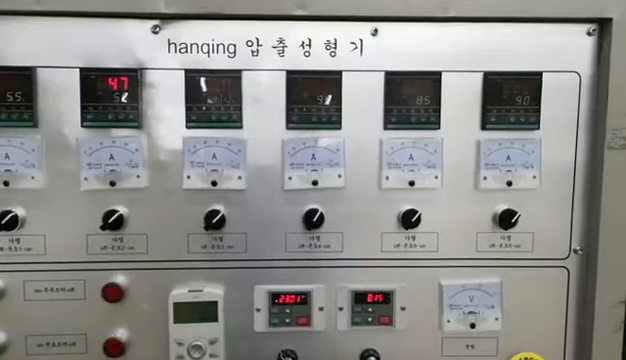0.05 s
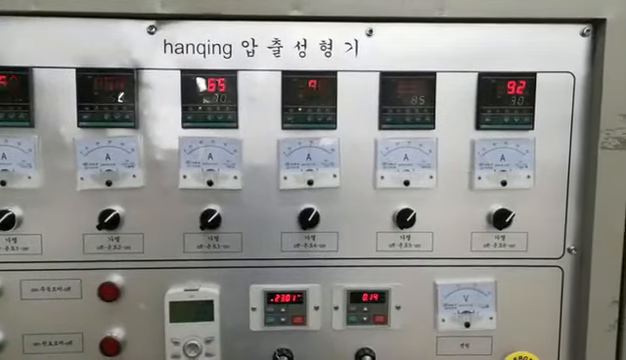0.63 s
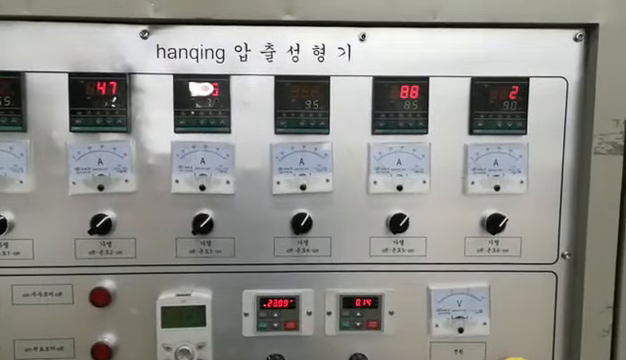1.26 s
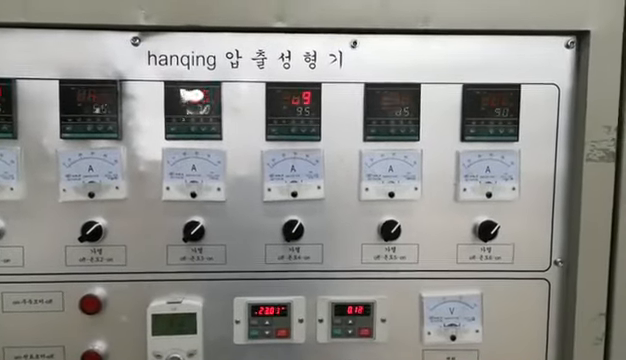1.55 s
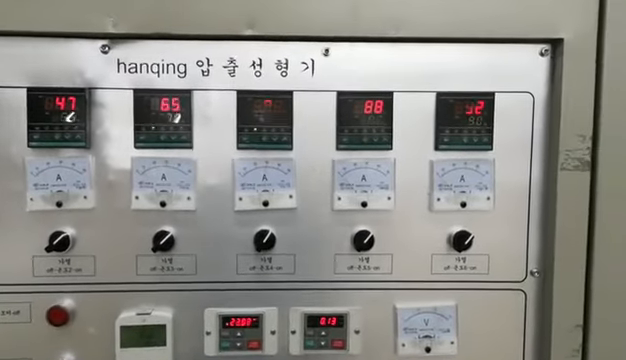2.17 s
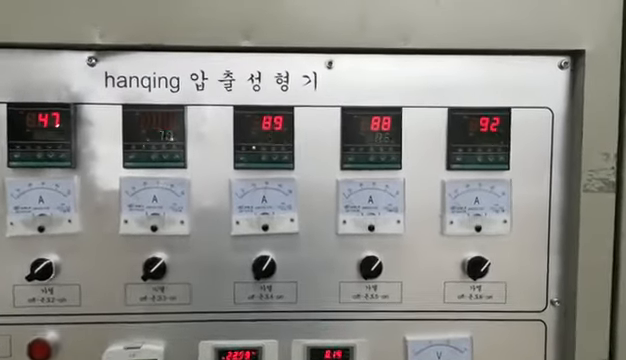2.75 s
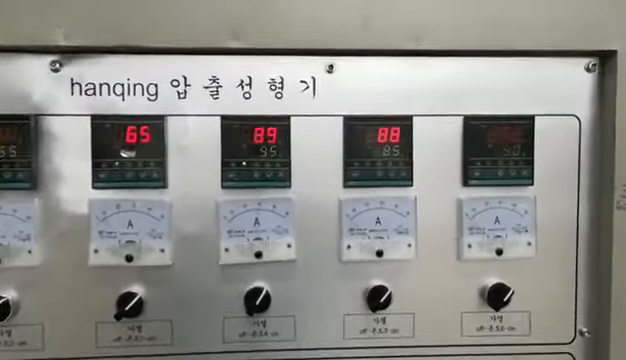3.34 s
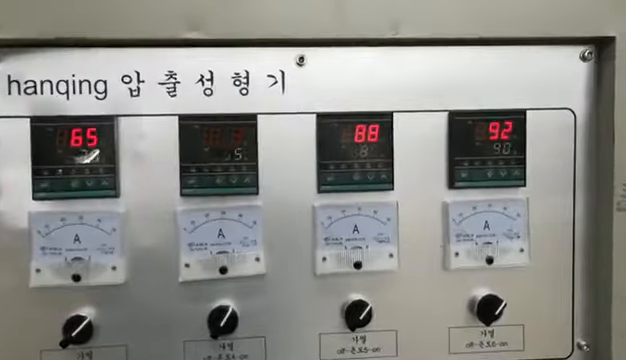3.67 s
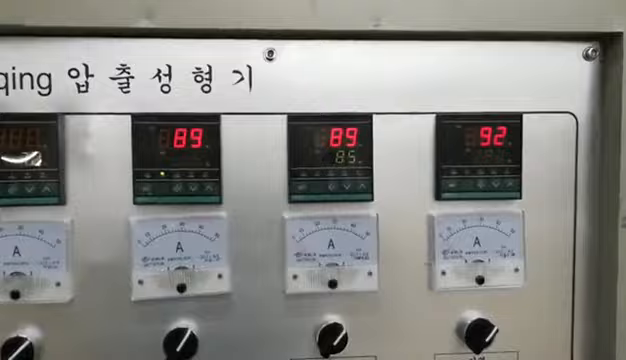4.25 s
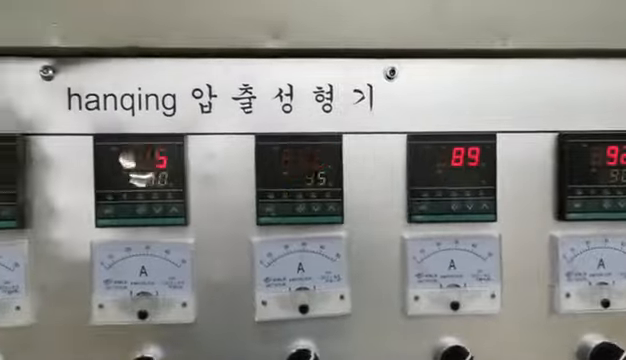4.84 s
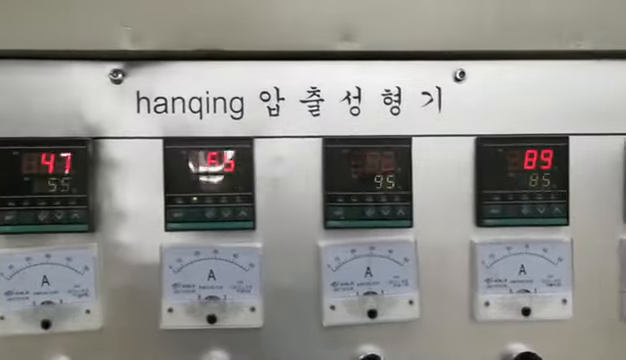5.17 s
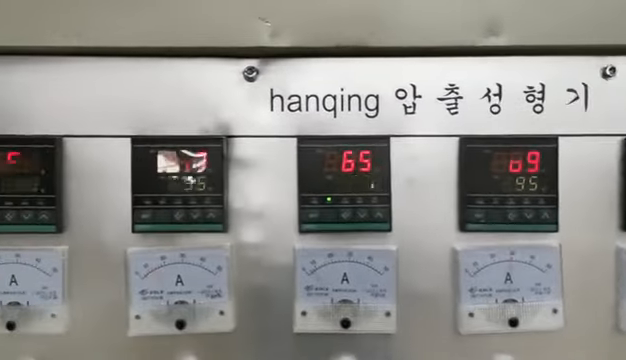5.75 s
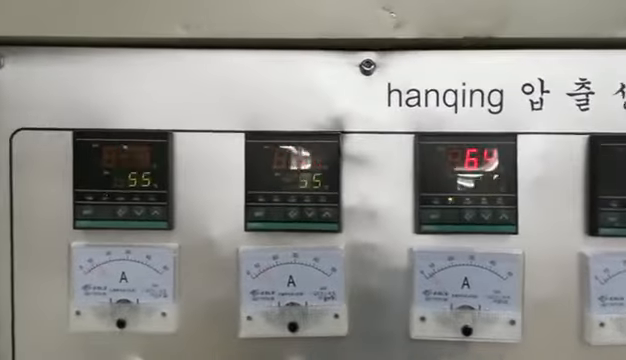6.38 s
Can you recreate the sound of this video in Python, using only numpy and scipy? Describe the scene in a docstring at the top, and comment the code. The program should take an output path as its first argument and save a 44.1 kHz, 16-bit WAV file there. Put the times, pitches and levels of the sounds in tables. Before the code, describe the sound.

From the first moment to the end, about 6.5 seconds later, a food extruder runs steadily in a factory hall. The main sound is a broad, even roar of cooling fans, wide and leaning slightly right. Beneath it the gearbox and screw rumble with small irregular throbs, a little stronger around 1.7, 2.7, 3.8 and 4.5 seconds, and the motor adds a low hum that pulses gently about once a second. On top sit a thin, fluttering hiss of air and the motor drive's high electrical whine with a fine sizzle. The whine swells briefly and shifts between left and right, most clearly near 1.6, 2.3, 3.5, 4.3 and 5.5 seconds, as the phone microphone drifts along the control cabinet. Nothing starts or stops, and the overall level stays nearly constant.

```python
"""A steady roar of cooling fans over a throbbing rumble: a food extruder running in a factory hall.
Gearbox and screw make the rumble, and the main motor hums at multiples of its shaft rate.
On top, inverter switching whines and sizzles in the motor frame, beside a thin hiss of air.
A phone drifts along the control cabinet through the hall's standing waves,
so hum and whine swell and sink at its two microphones."""
import sys
import numpy as np
from scipy import signal
from scipy.fft import rfft, irfft
from scipy.io import wavfile
from scipy.ndimage import uniform_filter1d

SR = 44100
rng = np.random.default_rng(int(sys.argv[2]) if len(sys.argv) > 2 else 0)


def materialize(psi):
    """Save the field psi as 16-bit PCM at rate SR to the path in sys.argv[1].

    A 1-D psi becomes a single channel; in a 2-D psi each row is a channel.
    """
    bounded = np.clip(np.atleast_2d(psi).T, -1, 1)
    quanta = np.round(bounded * 32767).astype(np.int16)
    wavfile.write(sys.argv[1], SR, quanta)


N = 291501
SOUND_M_S, MIC_GAP_M, SHAFT_HZ = 343, .14, 29.22


def undb(db):
    """Decibels to gain."""
    return 10 ** (np.asarray(db) / 20)


def unit(x):
    """Scale to an rms of 1."""
    return x / np.sqrt(np.mean(np.abs(x) ** 2))


def automation(table):
    """A (t/s, value) table as a lane, sample by sample."""
    times, values = np.transpose(table)
    return np.interp(np.arange(N) / SR, times, values)


def bins():
    """Frequency of every spectrum bin, floored at 1 Hz."""
    return np.maximum(np.arange(N // 2 + 1) * SR / N, 1)


def across(table):
    """A (f/Hz, value) table joined on a log-frequency axis."""
    hz, value = np.transpose(table)
    return np.interp(np.log(bins()), np.log(hz), value)


def pan(db):
    """Constant-power left and right gains; negative dB leans right."""
    gains = undb(np.array([db, -db]) / 2)
    return gains / np.sqrt(np.mean(gains ** 2, axis=0))


def walk(rate):
    """Random modulator: values held 1 / rate s and slewed twice; rms 1."""
    hold = int(SR / rate)
    steps = np.repeat(rng.standard_normal(N // hold + 1), hold)
    return unit(uniform_filter1d(uniform_filter1d(steps, hold), hold)[:N])


def flutter(rate):
    """An uneven tremble of about `rate` swings a second, with no slow drift; rms 1."""
    band = np.exp(-np.log2(bins() / rate) ** 2)
    return unit(irfft(rfft(rng.standard_normal(N)) * band, N))


def swells(rows):
    """Bell-shaped bumps, summed from rows of (centre t/s, length at half height/s, height)."""
    t = np.arange(N) / SR
    return sum(height * .5 ** ((2 * (t - centre) / length) ** 2) for centre, length, height in rows)


def leveller(pair, span_s):
    """Iron out level changes slower than span_s."""
    span = int(span_s * SR)
    power = np.mean(pair ** 2, axis=0)
    return pair / np.sqrt(uniform_filter1d(uniform_filter1d(power, span), span))


def multiband_ride(pair, edges_hz, rows, span_s):
    """Level each band, swell it with the rows pitched inside it, and restore its rms."""
    spectrum, out = rfft(pair), 0
    for low, high in zip(edges_hz, edges_hz[1:]):
        band = irfft(spectrum * ((bins() >= low) & (bins() < high)), N)
        rise_db = swells((t, length, db) for t, length, hz, db in rows if low <= hz < high)
        out = out + np.std(band) * unit(leveller(band, span_s) * undb(rise_db))
    return out


def turbulent(pair, depth_db, span_hz, span_s, size=512):
    """Eddies: random patches of spectrum, about span_hz wide and span_s long, swell and fade."""
    hz, times, spectra = signal.stft(pair, SR, nperseg=size)
    eddies = rng.standard_normal((len(hz), len(times)))
    eddies = uniform_filter1d(eddies, int(span_hz / hz[1]), axis=0)
    eddies = unit(uniform_filter1d(eddies, int(span_s / times[1]), axis=1))
    return signal.istft(spectra * undb(depth_db * eddies), SR, nperseg=size)[1][:, :N]


# Stereo image of the phone, which blends its lows to mono and widens its highs: f/Hz, left-right correlation
MIC_CORRELATION = [(50, 1), (100, .9988), (160, .992), (230, .94), (370, .5), (520, .05), (900, .13),
                   (1600, -.02), (7000, .03)]

def mic_pair(pair):
    """The phone blends the bass of its two microphones and leaves their treble unrelated."""
    left, right = rfft(pair)
    alike = np.clip(across(MIC_CORRELATION), -1, 1)
    mid = (left + right) / 2 * np.sqrt(1 + alike)
    side = (left - right) / 2 * np.sqrt(1 - alike)
    return irfft(np.array([mid + side, mid - side]), N)


def hall_noise(colour):
    """Diffuse noise at both microphones, shaped by a gain per bin."""
    white = rng.standard_normal((2, N))
    return unit(mic_pair(irfft(rfft(white) * colour, N)))


def standing_tone(hz, path_m, wobble_rad=0, reflections=8):
    """A tone arrives from many walls at once; the waves add and cancel along the phone's path."""
    bearing, phase = 2 * np.pi * rng.random((2, reflections, 1, 1))
    coarse = np.linspace(0, N - 1, reflections ** 3).astype(int)
    mics_m = np.array([[1], [-1]]) * MIC_GAP_M / 2
    lead_m = np.cos(bearing) * path_m[coarse] + np.sin(bearing) * mics_m
    field = np.exp(1j * (phase + 2 * np.pi * hz * lead_m / SOUND_M_S)).sum(axis=0)
    field = np.array([np.interp(np.arange(N), coarse, mic) for mic in field])
    oscillator = np.exp(1j * (2 * np.pi * hz * np.arange(N) / SR + wobble_rad))
    return unit(np.real(field * oscillator))


# Ringing modes of the motor frame: f/Hz, half-width/Hz, level/dB before panning
FRAME_MODES = [(4445, 32, -45.5), (5600, 20, -54), (5890, 100, -52), (6120, 50, -48), (6200, 25, -55),
               (6485, 35, -53), (6790, 65, -41), (7060, 90, -46)]

def frame_sizzle(pan_db=-2, flicker_db=2):
    """Switching noise sizzles in the narrow resonances of the motor frame."""
    power = sum((undb(db) * unit(1 / (1 + ((bins() - hz) / width) ** 2))) ** 2
                for hz, width, db in FRAME_MODES)
    sizzle = hall_noise(np.sqrt(power)) * np.sqrt(np.mean(power))
    return sizzle * undb(flicker_db * walk(25)) * pan(pan_db)[:, None]


# Antinode crossings, keyed by tone f/Hz: t/s, length/s, level/dB, microphone L or R
ANTINODES = { 6122.2: [(.15, .2, -40, "R"), (.6, .5, -44, "R"), (2.3, .25, -41.5, "R"),
             (3.05, .2, -39, "R"), (4.28, .3, -40, "L"), (5.35, .2, -38.5, "R")],
             6774.7: [(.18, .12, -34, "R"), (.2, .5, -41, "L"), (.75, .9, -34.3, "R"),
             (1.2, .2, -39.5, "L"), (1.27, .2, -36, "R"), (1.42, .14, -36, "L"), (1.6, .2, -29, "R"),
             (1.83, .18, -32, "R"), (2.2, .35, -32.3, "L"), (2.27, .2, -28.4, "R"), (2.53, .15, -33, "R"),
             (2.55, .25, -33.2, "L"), (2.88, .19, -31.5, "R"), (3, .08, -35.5, "L"),
             (3.22, .17, -34.3, "L"), (3.25, .15, -38.5, "R"), (3.5, .13, -30.3, "R"),
             (3.83, .13, -38.5, "R"), (4.2, .4, -41, "L"), (4.25, .32, -29, "R"), (4.55, .18, -37, "L"),
             (4.87, .14, -33, "L"), (5.08, .2, -31.2, "R"), (5.2, .2, -32, "L"), (5.32, .18, -31.3, "R"),
             (5.5, .15, -28, "R"), (5.87, .26, -32, "L"), (5.95, .24, -33, "R"), (6.28, .18, -33.5, "L"),
             (6.5, .13, -34, "R")], 6804.5: [(.1, .3, -33.3, "R"), (.75, .8, -36, "R"), (1.2, .2, -39, "L"),
             (1.68, .5, -36, "R"), (2.54, .22, -35, "R"), (2.96, .12, -35.5, "R"), (3.87, .22, -38.5, "L"),
             (4.21, .17, -35.3, "R"), (4.63, .23, -39, "L"), (4.85, .24, -33, "R"), (5.98, .35, -34.3, "R"),
             (6.48, .1, -37.5, "R")], 7081.7: [(.05, .4, -38, "R"), (.8, .75, -37.8, "R"),
             (1.55, .25, -43, "L"), (2.1, .15, -41.5, "R"), (3.53, .22, -38, "R"), (4.3, .3, -43, "L")]}

def carrier(hz, node_db, wobble_rad, drift_rad=1.5, rough_db=.6):
    """A strong drive tone swells as each microphone crosses an antinode."""
    drift = drift_rad * np.array([walk(1.622), walk(2.3)])  # each side has its own mix of reflections
    tone = unit(np.sin(2 * np.pi * hz * np.arange(N) / SR + drift + wobble_rad * walk(60)))
    swell_power = np.array([
        swells((t, length, undb(db) ** 2) for t, length, db, mic in ANTINODES[hz] if mic == side)
        for side in "LR"])
    return tone * np.sqrt(swell_power + undb(node_db) ** 2) * undb(rough_db * flutter(6.9))


# Lead tones of the inverter: f/Hz, level between swells/dB, phase wobble/rad
CARRIERS = [(6122.2, -49, .65), (6774.7, -48, .1), (6804.5, -47, .45), (7081.7, -48.5, .3)]
# Weaker drive tones, some a shaft rate apart: f/Hz, relative level/dB
SIDEBANDS = [(3312, -53), (3372.6, -51.5), (3402, -55), (3432, -48), (5802, -54.5), (5883, -55),
             (5903, -56), (6002.4, -51), (6465.3, -59.5), (6744, -45.7), (6890.6, -54), (7052, -50.5)]

def inverter_whine(path_m, pan_db=-3, sideband_trim_db=.5):
    """Inverter switching makes the motor sing: strong tones, and unsteady sidebands beating with them."""
    carriers = sum(carrier(*row) for row in CARRIERS)
    sidebands = sum(undb(db + sideband_trim_db) * standing_tone(hz, path_m, wobble_rad=.4 * walk(25))
                    for hz, db in SIDEBANDS)
    return carriers + sidebands * pan(pan_db)[:, None]


# Brief swells in the level of the roar and hiss: t/s, length/s, f/Hz (picks the band), rise/dB
BAND_SWELLS = [(.21, .1, 1800, 1.5), (.65, .12, 1800, 1.3), (1.06, .1, 4000, 1.9), (1.25, .14, 4000, 2.4),
               (1.26, .17, 750, 1.6), (1.26, .16, 1800, 1.2), (1.47, .05, 1800, 1), (1.57, .04, 1800, 1.2),
               (1.73, .06, 4000, 1.6), (1.74, .07, 1800, 1.1), (1.83, .06, 4000, 1.4),
               (1.88, .24, 750, 1.6), (1.93, .1, 1800, 1.6), (2.46, .08, 4000, 1.5), (2.54, .09, 1800, 1.2),
               (2.97, .04, 4000, 1.4), (3.16, .06, 1800, 1.5), (3.16, .07, 4000, 2.4), (3.38, .1, 1800, 1),
               (3.75, .2, 4000, 1.2), (3.82, .18, 1800, .9), (3.88, .28, 750, 2.1), (4.11, .13, 4000, 1.6),
               (4.26, .15, 750, 1.3), (4.48, .2, 750, 1.7), (4.87, .25, 750, 1.2), (5.21, .14, 4000, 1.4),
               (5.65, .08, 4000, 1.2), (6.43, .08, 1800, 1.3)]
# Edges of the bands that swell separately: f/Hz
SWELL_EDGES = [0, 550, 950, 3000, 9000]

def band_swells(noise, span_s, first_band=0):
    """The level of the roar or hiss swells briefly, band by band; bands below first_band are dropped."""
    return unit(multiband_ride(noise, SWELL_EDGES[first_band:], BAND_SWELLS, span_s))


# EQ of the hiss: f/Hz, relative level/dB
HISS_EQ = [(1500, -20), (3000, -3), (3800, 0), (4200, -3), (5400, -3.5), (5800, -6), (6150, -9),
           (6300, -24), (6600, -19), (7150, -9), (7350, -8)]

def air_hiss(tremble, level_db=-31.2):
    """A thin, fluttering hiss swells along with the upper bands of the roar."""
    tremble_db = .5 * tremble + .7 * flutter(6) + .7 * flutter(70)
    air = hall_noise(undb(across(HISS_EQ)))
    air = turbulent(air, depth_db=2.8, span_hz=220, span_s=.05)
    return band_swells(air, span_s=.15, first_band=2) * undb(level_db + tremble_db)


# Slow tremolos on the drone: period/s, first peak t/s, depth/dB
DRONE_BEATS = [(1.28, .1, 4.3), (1.02, .32, 2.7)]

def motor_drone(level_db=-41.0):
    """The shaft's tenth harmonic drones dead centre, in slow beats."""
    t = np.arange(N) / SR
    beat_db = sum(depth * np.cos(2 * np.pi * (t - peak) / period) for period, peak, depth in DRONE_BEATS)
    tone = unit(np.sin(2 * np.pi * 10 * SHAFT_HZ * t + walk(1.5)))
    return tone * undb(level_db + beat_db)


# Partials of the motor hum: multiple of the shaft rate, relative level/dB
HUM_PARTIALS = [(1, -52), (2, -38.5), (3, -42.5), (4, -40), (5, -44), (8, -42), (14, -52), (16, -46),
                (20, -47.5), (24, -53), (28, -52)]

def motor_hum(path_m, waver_db=2, trim_db=-3):
    """Harmonics of the shaft waver as the dough loads the screw unevenly."""
    hum = sum(undb(db + waver_db * walk(8)) * standing_tone(multiple * SHAFT_HZ, path_m)
              for multiple, db in HUM_PARTIALS)
    return undb(trim_db) * mic_pair(hum)


# EQ of the gearbox and screw: f/Hz, relative level/dB
RUMBLE_EQ = [(12, -22.5), (28, -11), (46, -9.5), (58, -3), (75, -2.5), (100, 0), (150, 1), (205, -1),
             (232, 0), (262, -5.5), (315, -4), (450, -10), (730, -10), (1600, -42)]
# Screw load, as the rumble's fader against the hum ahead of the leveller: t/s, level/dB
SCREW_LOAD = [(0, -25), (2.2, -25.5), (4.5, -24.5), (5.3, -25.5), (5.7, -25), (6.5, -25)]
# Throbs, from deep boom to hollow growl: t/s, length/s, f/Hz (picks the band), rise/dB
THROBS = [(.39, .1, 230, 2.7), (.6, .13, 230, 4.3), (.7, .35, 130, 2.3), (.75, .35, 60, 2),
          (.77, .09, 230, 3.3), (.8, .4, 430, 3), (1.05, .1, 130, 2), (1.33, .18, 230, 4.7),
          (1.5, .14, 60, 3.5), (1.73, .18, 60, 5.5), (1.81, .14, 230, 3.7), (1.93, .45, 130, 2.8),
          (2.03, .19, 430, 3.3), (2.17, .16, 60, 2.8), (2.33, .13, 130, 2.3), (2.45, .1, 230, 4.4),
          (2.49, .12, 60, 5), (2.61, .17, 430, 4), (2.73, .16, 60, 5.5), (2.76, .12, 130, 3.6),
          (2.95, .12, 230, 3.9), (2.96, .12, 130, 3), (3.2, .15, 230, 2.3), (3.27, .17, 130, 3),
          (3.3, .25, 60, 4.3), (3.57, .07, 130, 2.3), (3.67, .09, 60, 3.5), (3.76, .35, 430, 3.6),
          (3.79, .17, 130, 4.4), (3.93, .3, 230, 4.3), (4.02, .12, 130, 3), (4.25, .12, 130, 2),
          (4.26, .15, 430, 2.8), (4.47, .15, 60, 5), (4.5, .15, 130, 4.9), (4.57, .15, 230, 3.5),
          (4.8, .15, 230, 4.2), (4.84, .1, 130, 3.2), (5.25, .28, 130, 3.7), (5.45, .18, 230, 2.2),
          (5.46, .25, 60, 4.3), (5.84, .14, 60, 3.3), (6.1, .28, 230, 2.8), (6.12, .25, 60, 2.3),
          (6.27, .2, 130, 3.5), (6.55, .12, 230, 4), (6.56, .12, 130, 4), (6.57, .12, 430, 3.3)]
# Edges of the rumble bands that throb separately: f/Hz
RUMBLE_EDGES = [0, 80, 190, 310, 8000]

def gearbox(hum, trim_db=-0.22):
    """Gearbox and screw rumble; levelled together with the hum, they throb now deeper, now higher."""
    rumble = hall_noise(undb(across(RUMBLE_EQ))) * undb(automation(SCREW_LOAD) + trim_db)
    return multiband_ride(rumble + hum, RUMBLE_EDGES, THROBS, span_s=.13)


# EQ of the fan roar: f/Hz, relative level/dB
FAN_EQ = [(150, -24.5), (450, -2.5), (650, -12), (790, -5.5), (900, -2.5), (1100, 0.5), (1330, 0),
          (1550, 1), (1820, 2.9), (2000, 1), (2250, 0.95), (2850, -2), (3100, -5), (3850, -11), (4300, -14),
          (5400, -19), (6050, -14), (6330, -25), (7400, -39)]
# Fan placement, mostly to the right: f/Hz, left minus right level/dB
FAN_PAN = [(200, -0.5), (500, -5.5), (1000, 0), (1750, -4), (2500, -3), (3300, -1.8), (5000, -5),
           (7300, 6.5)]

def cooling_fans(tremble, level_db=-22.5, direct_db=-11):
    """Turbulent fan air roars through the hall; a small share comes straight from the right."""
    colour = undb(across(FAN_EQ)) * pan(across(FAN_PAN))
    lag_s = np.array([[.00064], [0]])  # the left microphone hears it later
    delay = np.exp(-2j * np.pi * bins() * lag_s)
    direct = unit(irfft(rfft(rng.standard_normal(N)) * colour * delay, N))
    air = hall_noise(colour) + undb(direct_db) * direct
    air = turbulent(air, depth_db=1.1, span_hz=500, span_s=.04)
    # narrow, shifting ridges stand for the standing waves the phone passes through
    air = turbulent(air, depth_db=1.5, span_hz=60, span_s=.22, size=2048)
    tremble_db = .5 * tremble + .35 * flutter(40)
    return band_swells(air, span_s=.12) * undb(level_db + tremble_db)


# The phone's drift along the cabinet: t/s, speed/(m/s)
PHONE_SPEED = [(0, .033), (.9, .045), (1.4, .12)]

def scene():
    """The extruder's low end, air and electrical top, mixed at the moving phone."""
    path_m = np.cumsum(automation(PHONE_SPEED)) / SR
    tremble = flutter(12)  # shared, so roar and hiss shiver together
    low_end = gearbox(motor_hum(path_m)) + motor_drone()
    air = cooling_fans(tremble) + air_hiss(tremble)
    return low_end + air + inverter_whine(path_m) + frame_sizzle()


def record(dry, cutoff_hz=7460):
    """The phone cuts the top steeply."""
    high_cut = signal.ellip(14, .1, 90, cutoff_hz, fs=SR, output="sos")
    return signal.sosfilt(high_cut, dry)


dry = scene()
out = record(dry)
materialize(out)
```